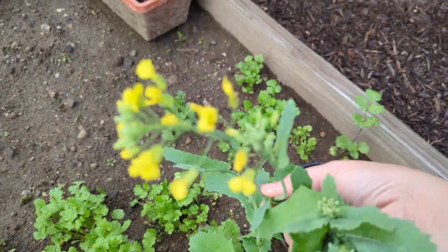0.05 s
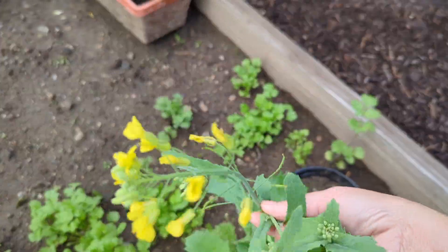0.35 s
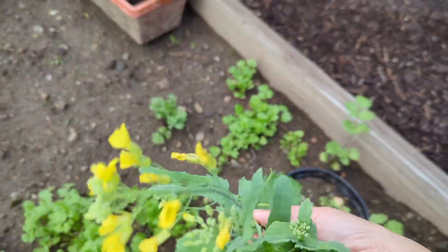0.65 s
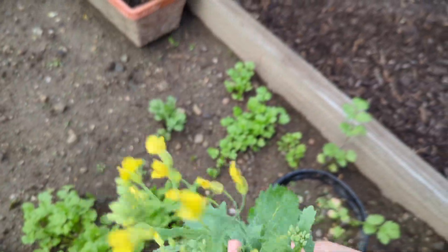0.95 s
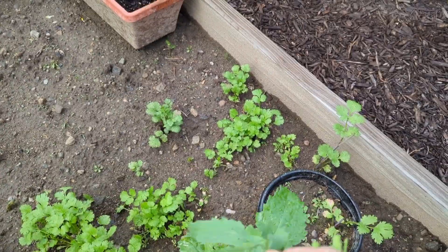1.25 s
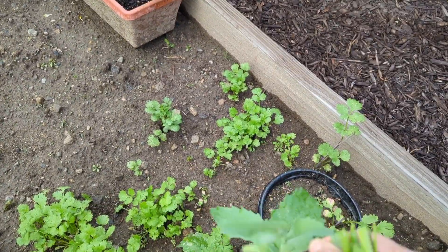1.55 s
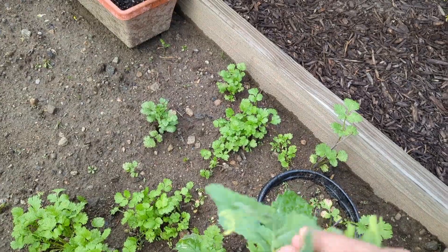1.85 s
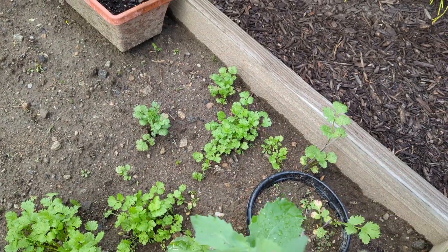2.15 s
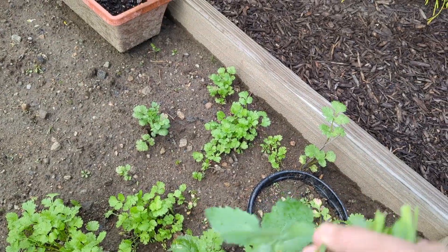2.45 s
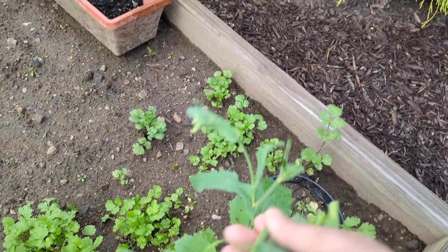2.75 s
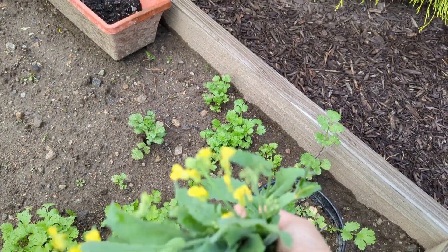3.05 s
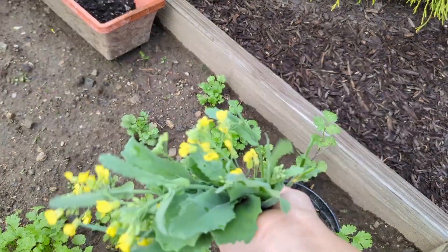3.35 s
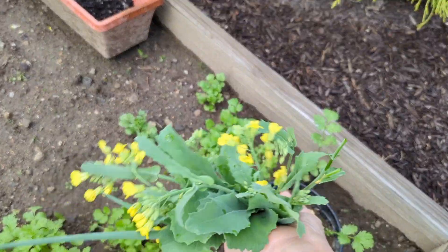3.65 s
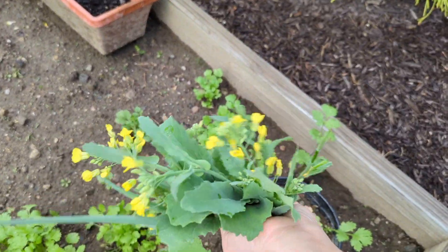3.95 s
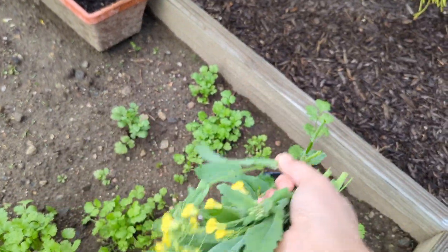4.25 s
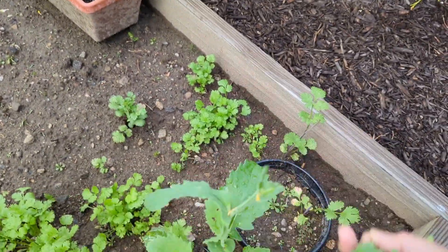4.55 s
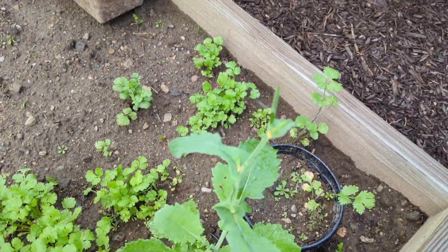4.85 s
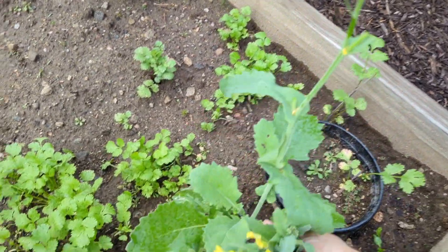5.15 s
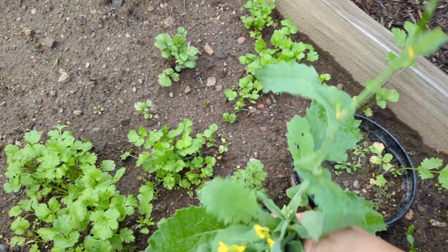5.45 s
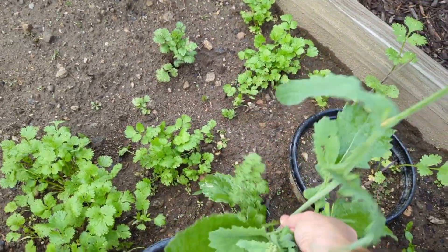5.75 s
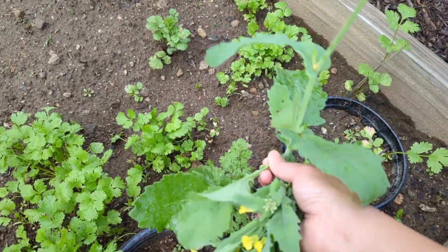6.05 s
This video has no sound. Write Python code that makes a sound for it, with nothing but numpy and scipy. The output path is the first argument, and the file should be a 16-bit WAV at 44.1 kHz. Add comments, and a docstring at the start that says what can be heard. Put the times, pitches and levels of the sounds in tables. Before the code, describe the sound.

Leafy stems rustle and snap as they are picked by hand outdoors, over a faint low rumble.

```python
"""Gathering greens in a garden

A hand picks flowering greens close to a pair of microphones, a little nearer the left one.
Leaves brush and tick against each other, juicy stalks crack and pop, a leaf tears fibre by fibre,
and the bunch bumps the palm. Far behind lie a low rumble of machinery or traffic, soft outdoor air
and a few faint birds."""
import sys
import numpy as np
from scipy import signal
from scipy.fft import rfft, irfft
from scipy.io import wavfile
from scipy.ndimage import uniform_filter1d

SR = 44100
rng = np.random.default_rng(int(sys.argv[2]) if len(sys.argv) > 2 else 0)


def put_to_file(sound):
    """Save the sound as 16-bit audio at rate SR, in the file named by the first command-line argument."""
    columns = np.atleast_2d(sound).T  # one column per channel
    safe = np.clip(columns, -1, 1)
    whole_steps = np.round(safe * 32767)
    wavfile.write(sys.argv[1], SR, whole_steps.astype(np.int16))


N = 274015
TIME = np.arange(N) / SR
SHORT = np.arange(2048) / SR  # time axis of one brief event

# stalks breaking: start_s, pop_hz, overtone_hz, pop_t60_s, pop_db, split_db, crack_db,
# relative_thud_db, left_minus_right_db
STALK_BREAKS = [(1.2656, 1530, 2840, 0.0038, -34, -36.5, -33.5, -47, 6.5),
                (1.3763, 1490, 2770, 0.0075, -31, -51, -38.5, -45, 4),
                (1.4008, 1360, 1700, 0.011, -36.5, -38, -25, -42.5, 4.5),
                (2.495, 980, 2110, 0.028, -33.5, -32, -22, -41, 2.5),
                (4.1634, 1826, 1960, 0.007, -38, -33, -34, -52, 2),
                (4.2107, 1250, 2270, 0.0055, -39, -37, -44, -50, 0.5),
                (5.8332, 1350, 2150, 0.0011, -24, -39.5, -31, -56, 3),
                (5.8667, 880, 2000, 0.0018, -27.5, -45.5, -39, -64, 2)]
# spectrum of a leaf blade: frequency_hz, gain_db
BLADE_SPECTRUM = [(200, -31.5), (600, -13.5), (1300, -1.5), (2400, 0.5), (3500, -1), (5000, -6), (7000, -5),
                  (9500, -23), (16000, -46.5)]
# spectrum of cracking plant skin: frequency_hz, gain_db
CRACK_SPECTRUM = [(3000, -43), (7000, -17), (8500, -1.5), (10000, -4), (12000, 1), (14000, -5.5),
                  (16500, -14)]
# spectrum of splitting fibres: frequency_hz, gain_db
SPLIT_SPECTRUM = [(1200, -34.5), (2500, 7.5), (3300, 3), (5000, 4.5), (6800, 5), (8500, -5), (12000, -43)]


def amp(db):
    """Decibels to gain."""
    return 10 ** (np.asarray(db) / 20)


def unit_rms(x):
    """Scales to an rms of one."""
    return x / np.sqrt(np.mean(x ** 2) + 1e-20)


def sized(x, db, hold_s=.01):
    """Gives a short sound the energy of level db held for hold_s."""
    return x * amp(db) * np.sqrt(hold_s * SR / (np.sum(x ** 2, -1).mean() + 1e-20))


def panned(db):
    """Microphone gains for a left-minus-right difference in dB."""
    return unit_rms(amp([[db / 2], [-db / 2]]))


def add(mix, start_s, sound):
    """Mixes a sound in at start_s."""
    part = mix[:, max(round(start_s * SR), 0):][:, :sound.shape[-1]]
    part += sound[..., :part.shape[1]]


def coloured(x, spectrum):
    """Minimum-phase filter with the given spectrum."""
    hz, db = np.transpose(spectrum)
    size = min(x.shape[1], 8192)
    bin_hz = abs(np.fft.fftfreq(2 * size, 1 / SR))
    log_gain = np.log(amp(np.interp(np.log(bin_hz + 1), np.log(hz), db)))
    response = np.exp(np.conj(signal.hilbert(log_gain)))
    taps = np.fft.ifft(response).real[:size]
    return signal.fftconvolve(x, taps[None], axes=1)[:, :x.shape[1]]


def noise_pair(size, alike):
    """White noise at the two microphones, with correlation alike."""
    mid, side = rng.standard_normal((2, size))
    return np.sqrt((1 + alike) / 2) * mid + np.sqrt((1 - alike) / 2) * np.array([side, -side])


def drift(rate_hz):
    """Slow random wander of unit size."""
    knots = rng.standard_normal(4096)
    return unit_rms(np.interp(TIME * rate_hz, np.arange(len(knots)), knots))


def rupture(impulse, tail_s, alike):
    """One sudden break, followed by a dying shower of bursting cells."""
    shower = np.exp(-SHORT / tail_s) * np.sqrt(rng.exponential(1, len(SHORT)))
    sound = noise_pair(len(SHORT), alike) * shower
    sound[:, 0] += impulse
    return sound


def ring(hz, t60):
    """One mode, dying by 60 dB in t60 seconds."""
    return np.sin(2 * np.pi * hz * SHORT) * np.exp(-np.log(1000) * SHORT / t60)


def distant_rumble(rumble_db=-48):
    """Far machinery or traffic rumbles with a wavering drone, and both slowly swell and sink."""
    # spectrum of the rumble: frequency_hz, gain_db
    spectrum = [(15, -51.5), (30, -40.5), (43, -1.5), (55, -10), (72, 4), (85, -5), (115, -1), (140, -9.5),
                (175, -19), (240, -27.5), (400, -45), (900, -65)]
    # drone tones before the swell: pitch_hz, level_db
    tones = [(56.5, -56), (71, -53.5), (117, -58.5)]
    # slow swell: time_s, gain_db
    swell = [(0, -1), (.7, -2.5), (1.1, 0.5), (1.9, -2), (2.9, 1.5), (3.6, 0), (4.7, 2), (5.5, -1),
             (6.2, -2.5)]
    rumble = amp(rumble_db) * unit_rms(coloured(noise_pair(N, 0.96), spectrum))
    for hz, db in tones:
        gain = amp(db + 1.63 * drift(1.39))
        phase = 2 * np.pi * np.cumsum(hz + 0.937 * drift(5)) / SR
        rumble += gain * unit_rms(np.sin(phase))
    return rumble * amp(np.interp(TIME, *np.transpose(swell)))


def outdoor_air(air_db=-65.5):
    """A soft, wide hiss of open air all around the microphones."""
    # spectrum of the air: frequency_hz, gain_db
    spectrum = [(60, -13), (200, -7.5), (450, 3.5), (800, -1), (1400, 1), (2400, -3), (4000, -7),
                (6700, -16), (8000, -18), (12000, -22.5), (16000, -31)]
    return amp(air_db + 0.47 * drift(2.68)) * unit_rms(coloured(noise_pair(N, 0.19), spectrum))


def handling(time_s):
    """Level in dB at which the hand stirs the bunch."""
    # briskness of the hand: time_s, level_db
    briskness = [(0, -70), (.3, -75), (.45, -63), (.7, -65.5), (.88, -57.5), (1.25, -59), (1.65, -64.5),
                 (1.85, -59.5), (2.3, -64.5), (2.55, -56.5), (2.88, -68), (3.8, -70.5), (4.1, -66),
                 (4.55, -64), (4.9, -57), (5.24, -65), (5.45, -57.5), (5.75, -60.5), (6.0, -56.5),
                 (6.2, -61)]
    return np.interp(time_s, *np.transpose(briskness))


def leaf_motion(brisk_db=-60, attack_share=0.18, release_share=0.33, shake_s=0.035):
    """Blade and crackle envelopes: steady handling, single strokes, and a shake after every snap."""
    # leaves sliding past each other: start_s, length_s, blade_db, crackle_db
    strokes = [(0.737, 0.052, -55, -59.5), (0.924, 0.028, -52.5, -68), (1.316, .055, -49, -49),
               (1.518, 0.14, -65, -62.5), (1.69, 0.08, -57.5, -58.5), (1.985, 0.08, -46.5, -49),
               (2.143, 0.078, -49, -46.5), (2.207, 0.069, -55, -55), (2.395, .07, -71, -64),
               (2.717, 0.1, -50, -54.5), (2.933, 0.08, -45.5, -50.5), (4.296, 0.12, -59.5, -62.5),
               (4.442, 0.096, -54.5, -60), (4.596, .1, -52, -55), (4.791, 0.087, -51, -56),
               (5.083, 0.058, -53.5, -63), (5.34, 0.11, -59.5, -77), (5.524, 0.039, -53.5, -59),
               (5.56, 0.11, -57, -67), (6.022, 0.11, -60, -58.5), (6.152, 0.026, -47.5, -57.5)]
    stir_db = handling(TIME)
    stir_crackle_db = brisk_db - 11.5 + 1.25 * (stir_db - brisk_db)  # grows faster than the blade noise
    power = amp([stir_db, stir_crackle_db]) ** 2
    for start_s, length_s, blade_db, crackle_db in strokes:
        progress = np.linspace(0, 1, int(length_s * SR))
        slide = np.clip(np.minimum(progress / attack_share, (1 - progress) / release_share), 0, 1)
        add(power, start_s, (amp([[blade_db], [crackle_db]]) * slide) ** 2)
    shake = amp([[-53], [-50.5]]) * np.exp(-TIME[:SR // 2] / shake_s)  # blade, crackle
    for start_s, *_ in STALK_BREAKS:
        add(power, start_s, shake ** 2)
    return np.sqrt(power)


def friction(slips_per_s, spread_db, clump_db, smooth):
    """Tiny slips of uneven size over a smooth brushing, swelling in clumps."""
    strength = amp(spread_db * np.minimum(rng.exponential(1, N), 3.5))
    slipping = rng.random(N) < slips_per_s / SR
    slips = unit_rms(strength * slipping * noise_pair(N, 0.12))
    brushing = smooth * noise_pair(N, 0.44)
    return (slips + brushing) * amp(clump_db * drift(130))


def flexing(x, patchy_db):
    """Bending leaves keep shifting their resonances."""
    spectra = signal.stft(x, nperseg=512)[2]
    patches = uniform_filter1d(rng.standard_normal(spectra.shape[1:]), size=7, axis=0)
    patches = unit_rms(uniform_filter1d(patches, size=6, axis=1))
    return signal.istft(spectra * unit_rms(amp(patchy_db * patches)), nperseg=512)[1][:, :N]


def rustle():
    """Soft leaves slide over each other and over the fingers."""
    blade_envelope, crackle_envelope = leaf_motion()
    rubbing = friction(slips_per_s=1700, spread_db=2.5, clump_db=2.4, smooth=0.94)
    crinkling = friction(slips_per_s=1500, spread_db=2.0, clump_db=2.8, smooth=0.72)
    blades = unit_rms(coloured(rubbing, BLADE_SPECTRUM)) * blade_envelope
    crackle = unit_rms(coloured(crinkling, CRACK_SPECTRUM)) * crackle_envelope
    return flexing(blades, 2.0) * panned(3.0) + flexing(crackle, 1.7) * panned(2.9)


def cracking(x, fibre_db=6):
    """Bright crack of plant skin; each fibre favours its own high pitch."""
    fibre = signal.iirpeak(rng.uniform(10800, 13300), 9, fs=SR)
    bright = coloured(x, CRACK_SPECTRUM)
    return bright + amp(fibre_db) * signal.lfilter(*fibre, bright)


def stray_ticks(per_s=9):
    """Chance flicks, as strong as the handling is brisk: start_s, crack_db, blade_db."""
    wait, crack_scatter_db, blade_scatter_db = rng.standard_normal((160, 3)).T
    start_s = np.cumsum(abs(wait)) / np.mean(abs(wait)) / per_s
    crack_db = handling(start_s) - 5.5 + crack_scatter_db
    blade_db = handling(start_s) - 0.5 + blade_scatter_db
    return list(np.transpose([start_s, crack_db, blade_db])[start_s < N / SR])


def leaf_ticks(bite_db=-7.5):
    """A leaf edge catches and lets go, and the blade rings for an instant."""
    # the clearest flicks of leaf against leaf: start_s, crack_db, blade_db
    flicks = [(.162, -56, -57.5), (.349, -75, -57), (.489, -87, -51.5), (.581, -68, -56.5),
              (.9448, -52, -64), (.953, -49, -59), (.991, -54, -76), (1.0953, -60.5, -53),
              (1.3245, -49.5, -55), (1.498, -61, -52), (1.5343, -55.5, -70), (1.545, -51, -74),
              (1.5773, -54, -62), (1.6553, -57, -83), (1.7157, -55.5, -55), (2.658, -53, -52),
              (2.7688, -47, -51), (2.9415, -53, -50.5), (2.9809, -51, -55.5), (3.0126, -57, -55),
              (3.3246, -56.5, -57.5), (4.4637, -54, -54), (4.7135, -54.5, -61), (4.9812, -55.5, -51),
              (5.5998, -48, -45.5), (6.057, -46.5, -58), (6.156, -53, -50.5)]
    out = np.zeros((2, N))
    for start_s, crack_db, blade_db in list(flicks) + stray_ticks():
        edge, flick = rupture(6, .003, alike=.5), rupture(6, .003, alike=.7)
        crack = sized(cracking(edge), crack_db)
        bite = sized(coloured(edge, SPLIT_SPECTRUM), crack_db + bite_db)
        flap = sized(coloured(flick, BLADE_SPECTRUM), -2)
        ping = sized(ring(rng.uniform(1900, 3000), t60=.006), -6)
        add(out, start_s, (crack + bite + sized(flap + ping, blade_db)) * panned(5.4))
    return out


def garden_reflections(x, decay_s):
    """Diffuse reflections from the soil, boards and plants."""
    t = TIME[:SR // 3]
    tail = noise_pair(len(t), 0.22) * np.exp(-t / decay_s) * (t > .004)
    return signal.fftconvolve(x, tail / np.linalg.norm(tail[0]), axes=1)[:, :N]


def birds(echo_db=-1):
    """Faint gliding calls and a trill, scattered by the garden on their way to the microphones."""
    # low hoots to thin whistles: start_s, length_s, start_hz, end_hz, warble_share, level_db
    calls = [(.22, 0.31, 513, 512.5, 0.011, -75.5), (.68, 0.076, 516, 516, .012, -77),
             (1.2, 0.052, 8400, 7900, 0.045, -67), (2.37, 0.016, 8200, 8340, 0.029, -66.5),
             (3.38, 0.1, 6400, 6660, 0.057, -72), (3.44, 0.22, 8200, 8000, .035, -83),
             (3.8, 0.11, 6450, 6150, 0.054, -73), (3.928, 0.11, 8250, 8100, 0.032, -83.5),
             (4.241, .15, 2400, 2375, .02, -73), (4.572, 0.167, 2384, 2305, 0.017, -66.5),
             (5.832, 0.037, 4690, 4480, 0.012, -53.5), (6.062, 0.061, 4490, 4455, 0.007, -59.5)]
    # each falling chip of the trill: start_hz, end_hz, level_db
    trill = (5550, 4300, -60.5)
    top_hz, bottom_hz, trill_db = trill
    chips = [(s, .008, top_hz, bottom_hz, .04, trill_db) for s in np.arange(5.381, 5.6, .021)]
    out = np.zeros((2, N))
    for start_s, length_s, start_hz, end_hz, warble, db in calls + chips:
        size = int(length_s * SR)
        hz = np.linspace(start_hz, end_hz, size) * (1 + warble * drift(899)[:size])
        call = signal.windows.tukey(size, .7) * np.sin(2 * np.pi * np.cumsum(hz) / SR)
        add(out, start_s, amp(db) * unit_rms(call))
    return out + amp(echo_db) * garden_reflections(out, decay_s=0.061)


def pith_pop(hz, over_hz, t60, shower_db=-6, overtone_db=-1):
    """The pith rings in two modes while its cells burst."""
    spectrum = [(hz * .2, -40), (hz * .38, -20), (hz * .55, -8), (hz, -1),
                (over_hz, 0), (over_hz * 1.4, -2), (over_hz * 2, -15), (9000, -32)]
    cells = coloured(rupture(0, 0.0023 + 0.27 * t60, alike=0.73), spectrum)
    shower = sized(np.roll(cells, 30, axis=1), shower_db)
    modes = sized(ring(hz, t60), 0) - sized(ring(over_hz, t60 * 1.18), overtone_db)
    low_cut = signal.butter(4, hz * 0.52, "high", fs=SR, output="sos")  # thin stalks radiate little bass
    return sized(signal.sosfilt(low_cut, modes), 0) + shower


def stalk_snaps(thud_hz=325, thud_t60=0.023, thud_trim_db=-10.5, pop_lag_s=0.00018):
    """A turgid stalk breaks: the skin cracks, the pith pops, and the hand takes a small jolt."""
    out = np.zeros((2, N))
    thud = ring(thud_hz, thud_t60) * (1 - np.exp(-SHORT / 0.00056))
    for start_s, hz, over_hz, t60, pop_db, split_db, crack_db, thud_db, pan_db in STALK_BREAKS:
        skin = rupture(9, .003, alike=.4) + np.roll(rupture(-7, .001, alike=.4), 8, axis=1)
        crack = sized(cracking(skin, fibre_db=3.3), crack_db)
        split = sized(coloured(rupture(7, .0028, alike=.4), SPLIT_SPECTRUM), split_db)
        pop = sized(pith_pop(hz, over_hz, t60), pop_db)
        jolt = sized(thud, thud_db + thud_trim_db)
        add(out, start_s, (crack + split) * panned(pan_db))
        add(out, start_s + pop_lag_s, pop * panned(pan_db * 1.2) + jolt)
    return out


def leaf_tears(slack_db_per_s=271, ring_slack_db_per_s=10, jitter_s=.0005, spread_db=0.1):
    """Fibres part one after another at a nearly even pace, each plucking the held stalk."""
    # pulls on a leaf: start_s, length_s, fibre_gap_s, hardest_after_s, crack_db, split_db, ring_db
    pulls = [(1.984, .07, .013, 0.013, -44.5, -40.5, -45), (2.148, .047, .0083, 0.044, -38, -53, -53.5),
             (2.23, .023, .006, 0.0054, -50.5, -57, -47.5)]
    # modes of the held stalk: pitch_hz, relative_db, t60_s
    modes = [(261, -4, 0.043), (404, 1.5, 0.018), (974, -1, 0.041), (1273, -1, 0.029), (1520, -1, 0.017),
             (2155, 8, 0.013)]
    out = np.zeros((2, N))
    for start_s, length_s, gap_s, hardest_s, crack_db, split_db, ring_db in pulls:
        for after_s in np.arange(0, length_s, gap_s):
            late, weakness = rng.standard_normal(2)
            away_s = abs(after_s - hardest_s)  # fibres sound weaker either side of the hardest moment
            force_db = -spread_db * weakness - slack_db_per_s * away_s
            skin, fibre = rupture(7, .0024, alike=.5), rupture(7, .0022, alike=.5)
            crack = sized(cracking(skin), crack_db + force_db)
            split = sized(coloured(fibre, SPLIT_SPECTRUM), split_db + force_db)
            stalk = sum(amp(db) * (-1) ** k * ring(hz * rng.uniform(0.93, 1.04), t60)
                        for k, (hz, db, t60) in enumerate(modes))
            stalk *= 1 - np.exp(-SHORT / 0.0011)  # swells as the bend runs along the stalk
            stalk = sized(stalk, ring_db - ring_slack_db_per_s * away_s)
            parting = (crack + split) * panned(4.2) + stalk * panned(1.3)
            add(out, start_s + after_s + jitter_s * late, parting)
    return out


def palm_knocks():
    """The soft bunch bumps the palm."""
    # bumps: start_s, level_db
    bumps = [(2.506, -46), (4.214, -45.5), (5.462, -61), (6.004, -55), (6.158, -59.5)]
    # dull spectrum of a bump: frequency_hz, gain_db
    spectrum = [(90, -27.5), (200, -3.5), (340, 0), (600, -7.5), (1500, -11.5), (4000, -41)]
    out = np.zeros((2, N))
    for start_s, db in bumps:
        add(out, start_s, sized(coloured(rupture(1, 0.0065, alike=.95), spectrum), db))
    return out


def spaced_microphones(x):
    """The plants are nearer to the left microphone, so their sound reaches it first."""
    # phase lead of the left microphone: frequency_hz, lead_rad
    left_lead = [(0, 0), (1000, 0.85), (2500, 0.8), (5000, 1.34), (9000, 1.82), (16000, 0.44)]
    lead_rad = np.interp(np.fft.rfftfreq(N, 1 / SR), *np.transpose(left_lead))
    right = irfft(rfft(x[1]) * np.exp(-1j * lead_rad), N)
    return np.array([x[0], right])


def scene(reflections_db=-23):
    """The plants close by, their faint reflections, and the garden behind."""
    plants = spaced_microphones(stalk_snaps() + leaf_tears() + leaf_ticks() + palm_knocks() + rustle())
    reflections = amp(reflections_db) * garden_reflections(plants, decay_s=0.029)
    return plants + reflections + birds() + distant_rumble() + outdoor_air()


def record(dry):
    """The recorder's band limit cuts the highest treble."""
    low_pass = signal.firwin(255, cutoff=16200, window=("kaiser", 8), fs=SR)
    return signal.oaconvolve(dry, low_pass[None], "same")


dry = scene()
out = record(dry)
put_to_file(out)
```